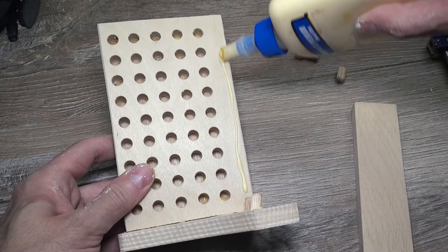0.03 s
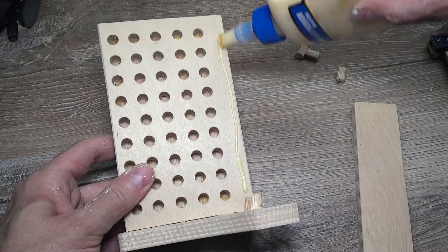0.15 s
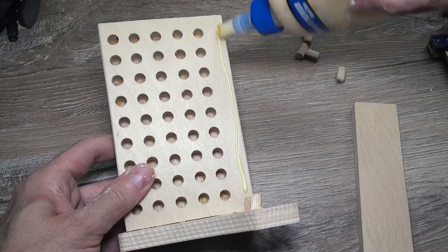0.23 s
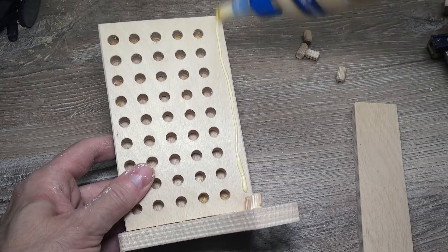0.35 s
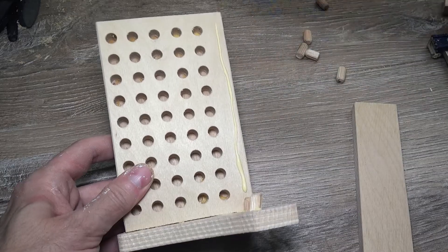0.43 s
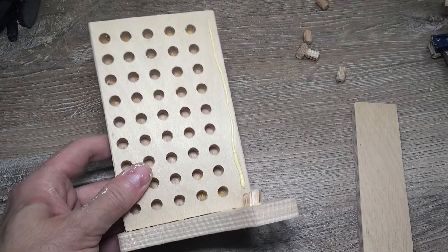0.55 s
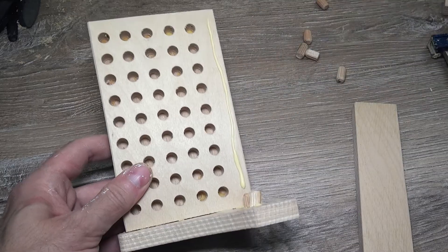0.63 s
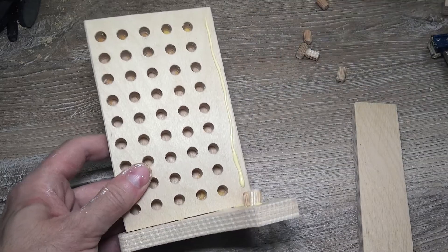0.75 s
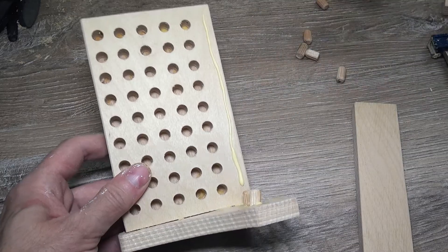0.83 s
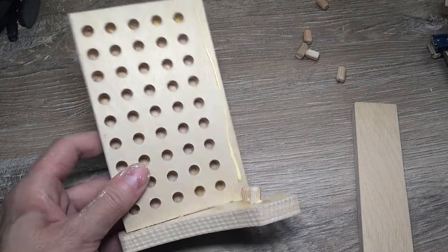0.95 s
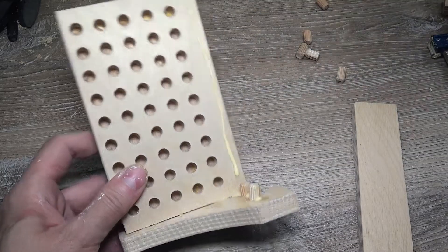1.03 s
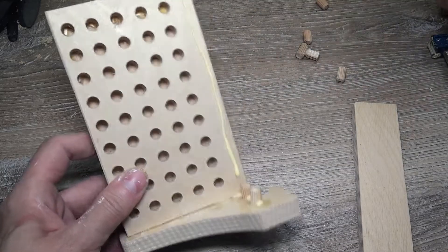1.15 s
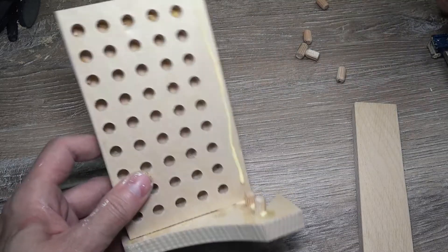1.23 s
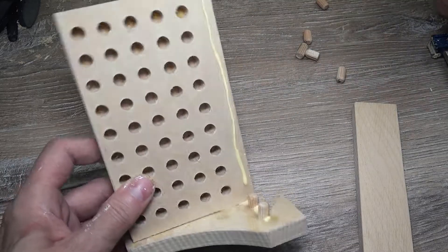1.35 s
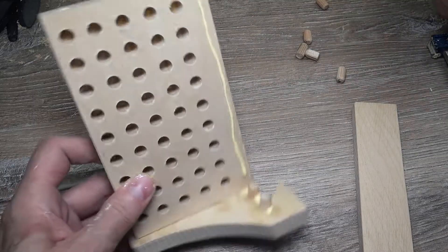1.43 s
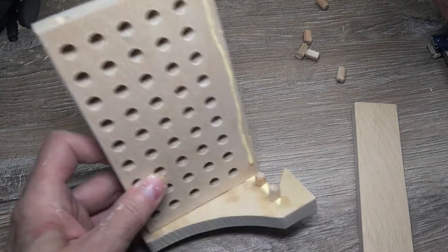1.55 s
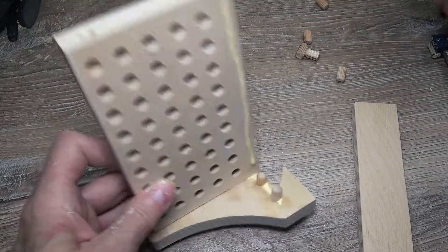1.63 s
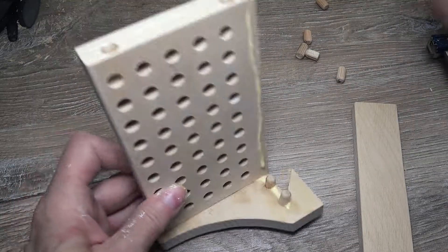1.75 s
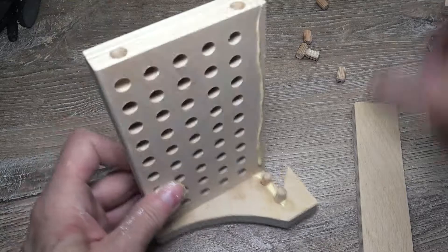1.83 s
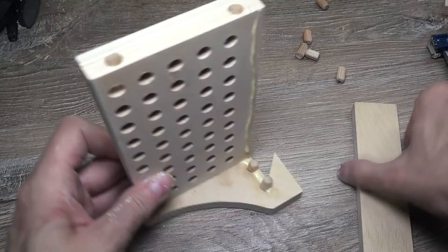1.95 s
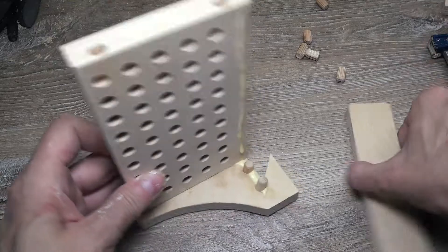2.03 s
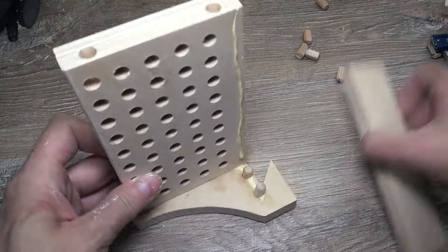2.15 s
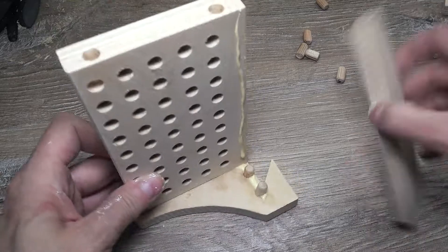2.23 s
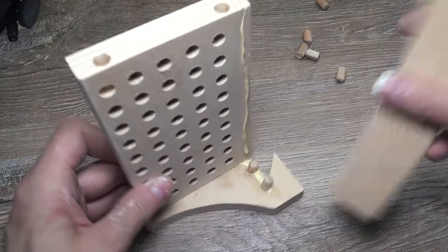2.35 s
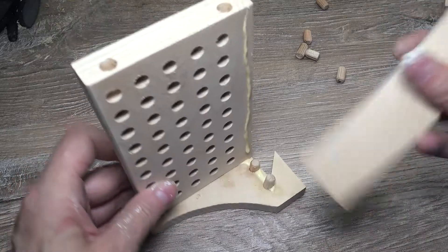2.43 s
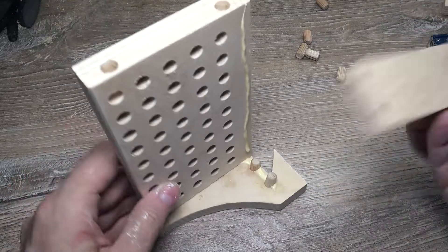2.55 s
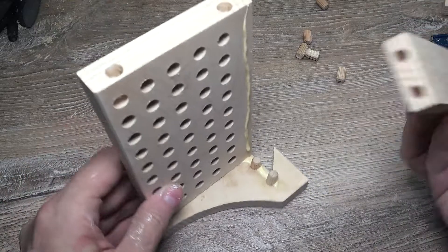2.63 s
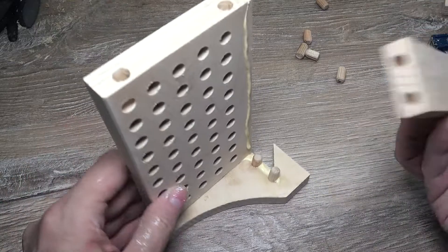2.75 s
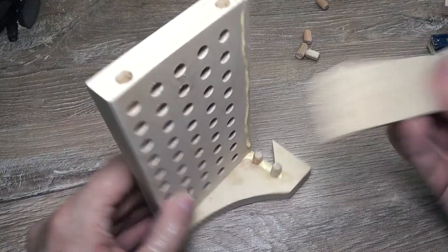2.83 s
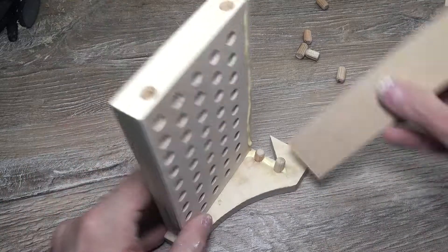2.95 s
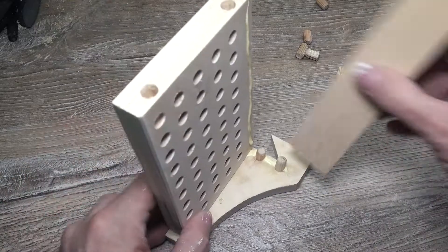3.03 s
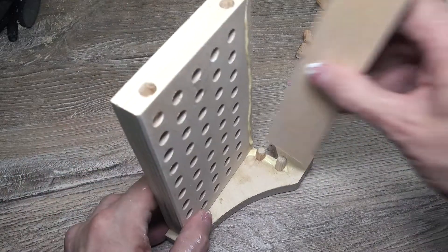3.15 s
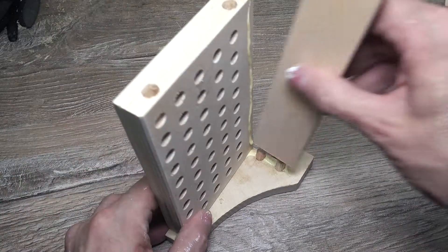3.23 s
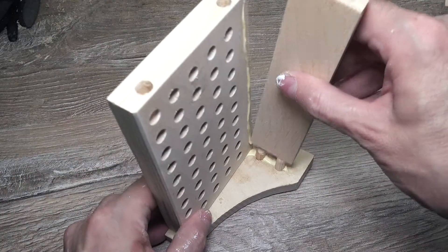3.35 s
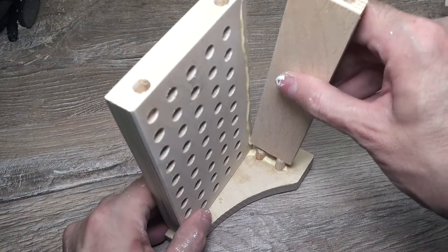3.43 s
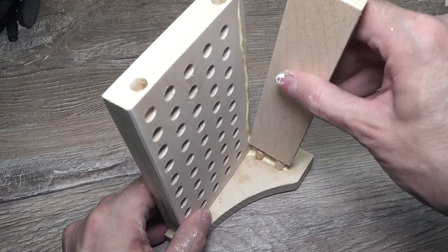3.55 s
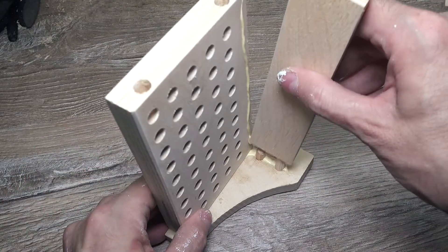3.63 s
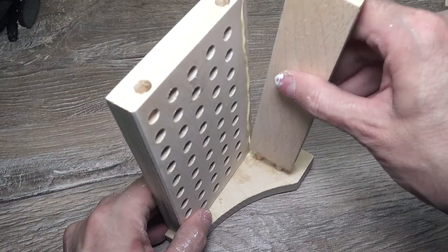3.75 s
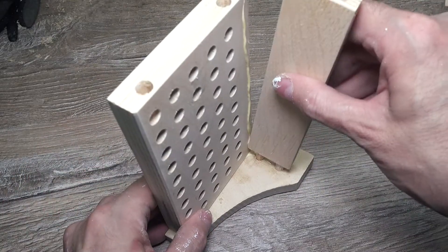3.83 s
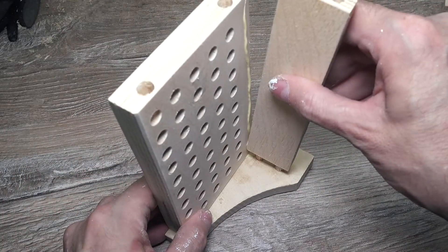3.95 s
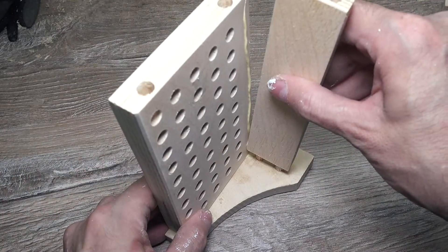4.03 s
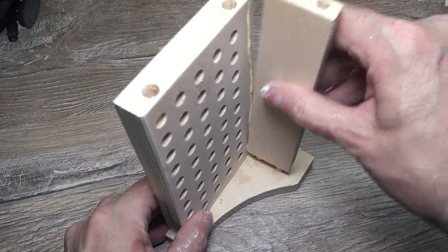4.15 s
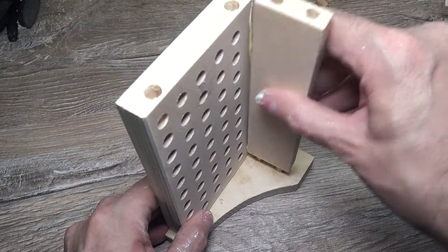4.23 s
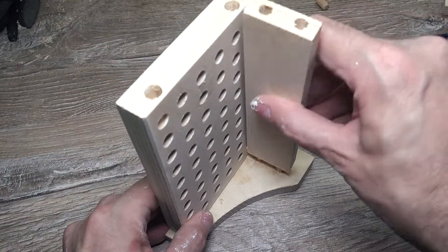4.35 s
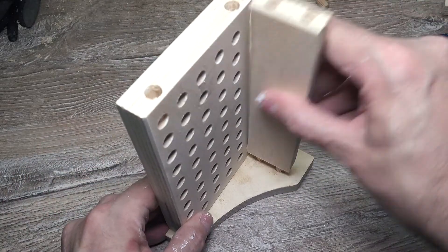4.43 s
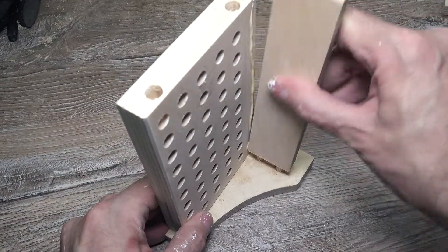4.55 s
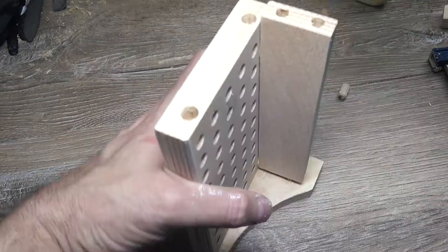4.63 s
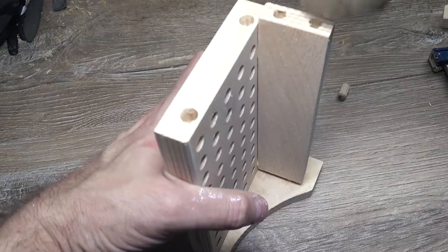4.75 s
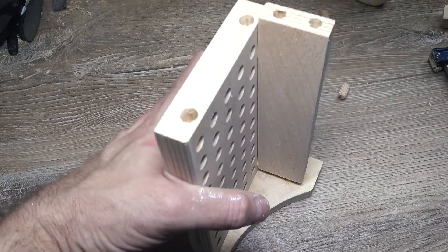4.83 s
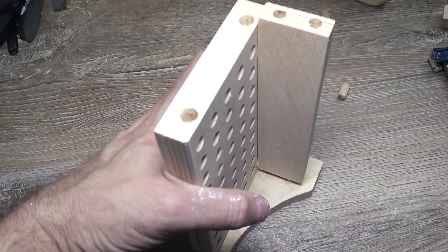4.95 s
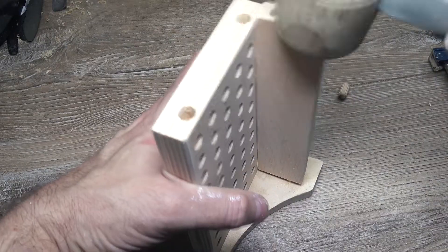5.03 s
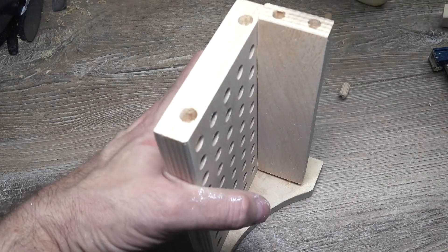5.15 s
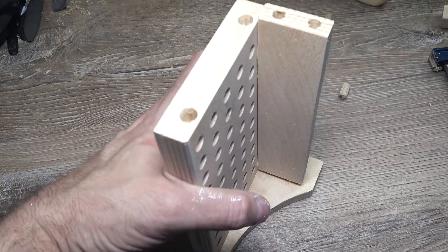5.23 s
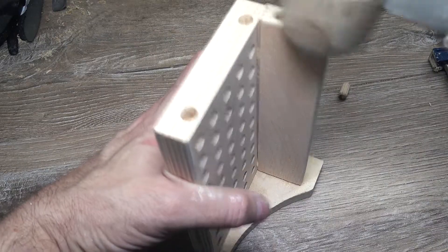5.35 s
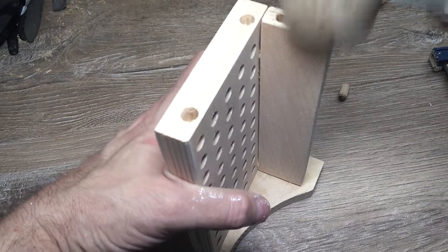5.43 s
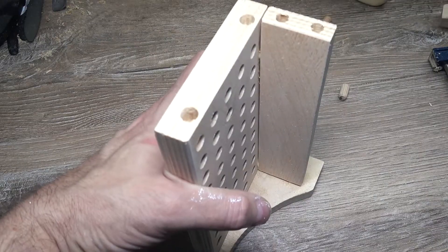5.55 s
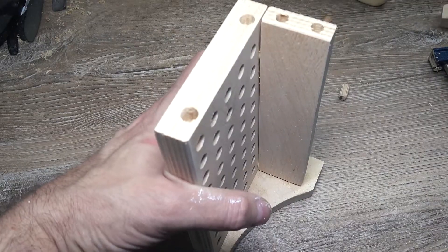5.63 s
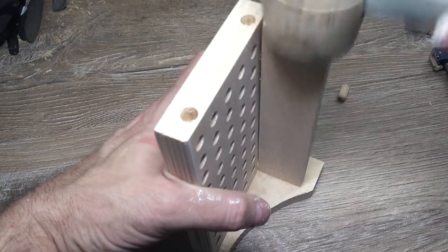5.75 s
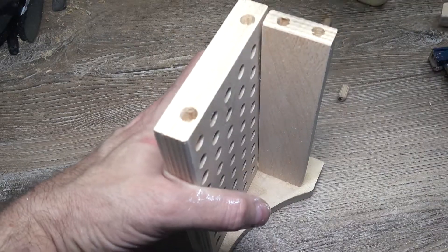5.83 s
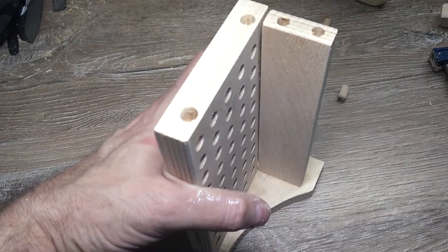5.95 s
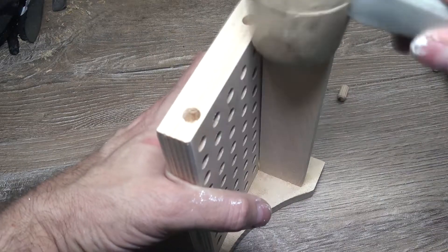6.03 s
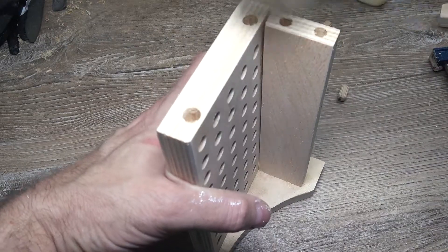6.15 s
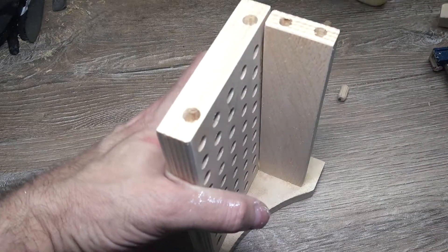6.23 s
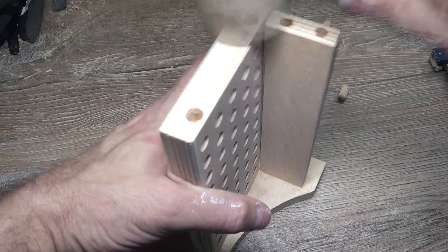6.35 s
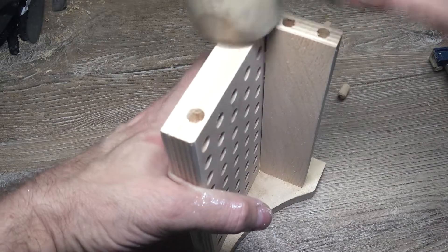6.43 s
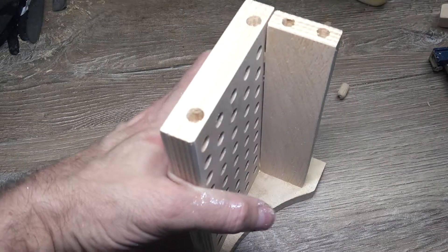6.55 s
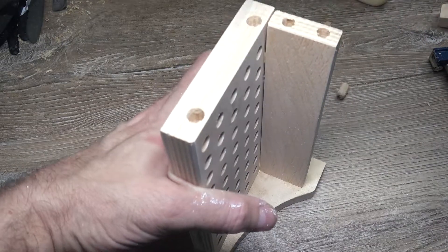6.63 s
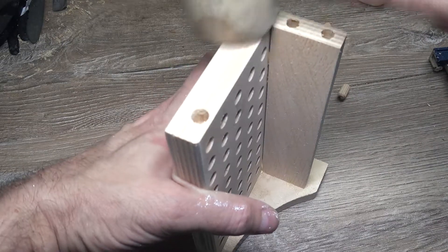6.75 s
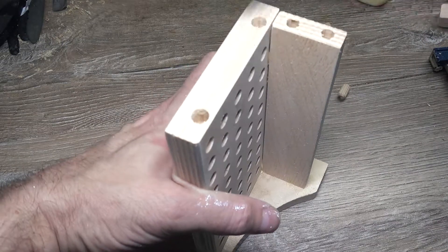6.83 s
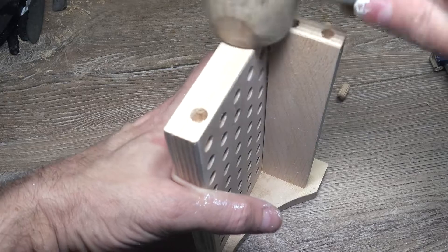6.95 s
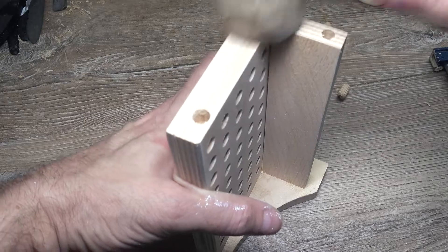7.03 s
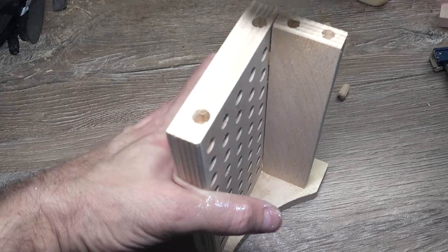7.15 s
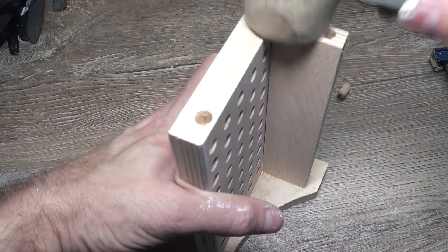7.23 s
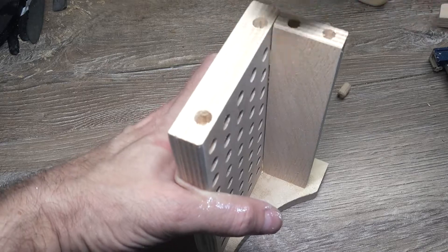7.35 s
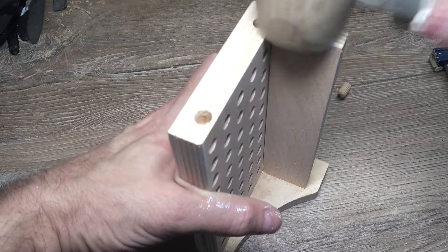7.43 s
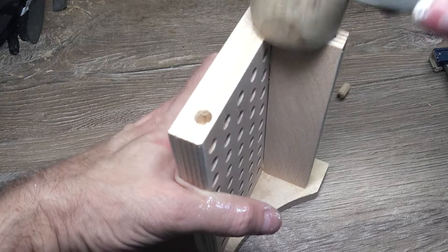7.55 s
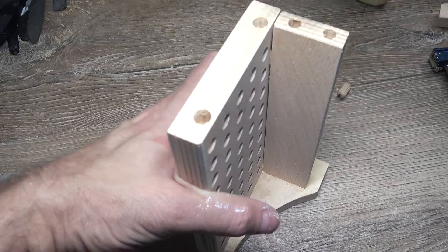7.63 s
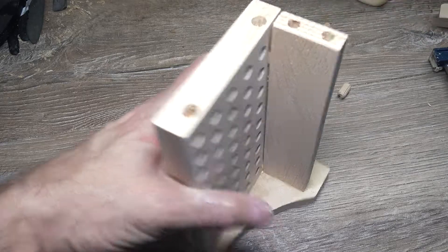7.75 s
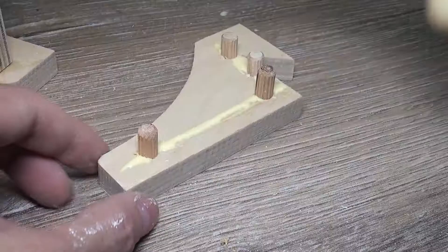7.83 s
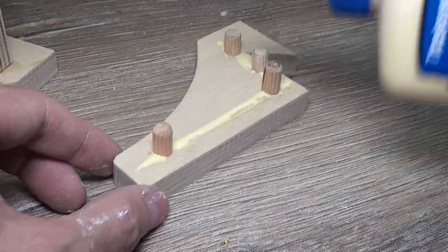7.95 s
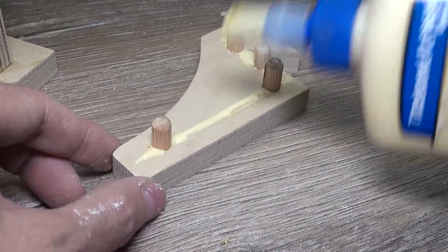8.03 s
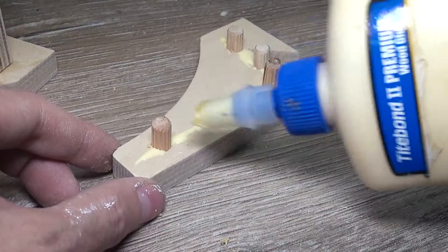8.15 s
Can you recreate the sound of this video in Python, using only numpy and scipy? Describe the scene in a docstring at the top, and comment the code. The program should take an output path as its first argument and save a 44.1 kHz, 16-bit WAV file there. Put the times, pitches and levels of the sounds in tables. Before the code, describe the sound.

Soft rumble and light wooden knocks over low room tone, a short wood rub, then nine loud, boomy mallet hits in a small workshop.

```python
"""A soft rumble over room tone, then light knocks: a drilled plywood block is turned, knocked and dragged on a
hollow bench in a small workshop. A strip is pushed onto dowels; a wooden mallet drives it home in nine quick blows.
Hits and rumbles excite decaying bench and block modes; rubs and ticks add gliding narrow bands and hiss.
Noise in third-octave bands carries the room ring and room tone; a limiter holds the blows down."""
import sys
import numpy as np
from scipy import signal
from scipy.fft import rfft, irfft, next_fast_len
from scipy.io import wavfile

SR = 44100
rng = np.random.default_rng(int(sys.argv[2]) if len(sys.argv) > 2 else 0)


def materialize(psi):
    """Save the field psi as 16-bit PCM at rate SR to the path in sys.argv[1].

    A 1-D psi becomes a single channel; in a 2-D psi each row is a channel.
    """
    bounded = np.clip(np.atleast_2d(psi).T, -1, 1)
    quanta = np.round(bounded * 32767).astype(np.int16)
    wavfile.write(sys.argv[1], SR, quanta)


def ratio_of_db(decibels):
    """Turn decibels (scalar or array-like) into linear amplitude factors; 0 dB maps to 1."""
    return 10 ** (np.asarray(decibels, float) / 20)


N = 361176


def at_hz(points, hz):
    """A spectrum read on a log-frequency axis."""
    table_hz, value = np.array(points).T
    return np.interp(np.log(hz), np.log(np.maximum(table_hz, 1)), value)


def flicker(points_per_s):
    """Random points of spread 1, joined by straight lines."""
    points = rng.standard_normal(int(N / SR * points_per_s) + 2)
    return np.interp(np.arange(N) / SR * points_per_s, np.arange(len(points)), points)


# instants at which all ringing stops: time [s]
STOPS_S = [4.676, 7.832]


def between_stops(b, a, x):
    """A recursive filter that forgets its past at each stop."""
    parts = np.split(x, np.round(np.array(STOPS_S) * SR).astype(int))
    return np.concatenate([signal.lfilter(b, a, part) for part in parts])


def mode(x, hz, t60_s):
    """A damped resonance: a unit click starts a decaying sine of height 1."""
    radius, angle = ratio_of_db(-60 / (t60_s * SR)), 2 * np.pi * hz / SR
    return between_stops([0, np.sin(angle)], [1, -2 * radius * np.cos(angle), radius * radius], x)


def fade(x, time_constant_s):
    """Each impulse dies away exponentially."""
    return between_stops([1], [1, -np.exp(-1 / (time_constant_s * SR))], x)


def swells(rows, column):
    """Each event swells to its peak and dies away, 20 dB in its rise and in its fall time."""
    t, out = np.arange(N) / SR, np.zeros(N)
    for row in rows:
        peak_s, rise_s, fall_s = row[:3]
        near = slice(max(int((peak_s - 3 * rise_s) * SR), 0), int((peak_s + 3 * fall_s) * SR))
        late_s = t[near] - peak_s
        out[near] += ratio_of_db(row[column] - 20 * np.maximum(late_s / fall_s, -late_s / rise_s))
    return out


# mallet blows, relative levels:
# (time [s], crack [dB], room ring [dB], treble ring [dB], deep bench [dB])
BLOWS = [(5.052, 8.5, -3, -9, -9.5), (5.394, 3.5, -5.5, -12.5, -10.5), (5.720, 3.5, -5, -11.5, -11.5),
         (6.032, 0.5, -6.5, -17, -17.5), (6.398, 1.5, -9, -19.5, -18), (6.711, 1, -11.5, -22.5, -16.5),
         (6.976, 0, -14, -27.5, -21.5), (7.227, 2.5, -14.5, -28, -20.5), (7.474, -1.5, -15, -30, -23)]
# wood set down or bumped on the bench; the 7.832 s row is a click at the abrupt stop; relative levels:
# (time [s], crack [dB], room ring [dB], deep bench [dB], upper bench [dB])
KNOCKS = [(0.418, -44, -66, -75, -56.5), (0.761, -48, -76, -73, -78), (1.158, -21, -32, -16, -30),
          (1.34, -40, -36, -28, -39), (1.678, -19.5, -29, -16.5, -21), (1.954, -31.5, -31.5, -32, -38.5),
          (2.102, -32.5, -27.5, -26, -55), (2.225, -21, -29.5, -40, -64), (2.254, -16.5, -33, -48, -69),
          (2.318, -39, -67, -55, -54), (2.362, -34, -55.5, -49, -66), (2.397, -36, -43, -56, -45.5),
          (2.862, -49, -49.5, -63, -44.5), (3.445, -45, -39, -35, -41), (3.848, -50, -46, -35.5, -49),
          (3.921, -46.5, -63, -42, -54), (4.254, -48.5, -68, -58, -71), (4.442, -46, -56.5, -43.5, -60),
          (4.473, -33.5, -37.5, -59, -58), (4.505, -36.5, -50.5, -36.5, -44.5), (4.556, -26, -33, -61, -57),
          (4.666, -48, -43.5, -42.5, -42), (4.757, -56, -56, -41.5, -61.5), (7.01, -21, -25.5, -39, -28.5),
          (7.041, -26.5, -28, -38, -28.5), (7.261, -18, -22.5, -37, -44), (7.69, -32, -37, -54, -47),
          (7.832, -39, -56, -41.5, -56), (7.917, -32, -39.5, -66, -72), (8.093, -39, -43, -69, -78)]


def all_hits():
    """Blows, then knocks: rows of (s, crack, room ring, treble ring, deep bench, upper bench dB)."""
    blows = [(*row, -11 + 0.32 * row[2]) for row in BLOWS]   # upper bench follows room ring
    knocks = []
    for s, crack, ring, deep, upper in KNOCKS:
        treble = ring - 17 + 0.72 * (crack - ring)   # a sharper crack brightens the ring
        knocks.append((s, crack, ring, treble, deep, upper))
    return np.array(blows + knocks)


def clicks(level_db):
    """One impulse at each row of all_hits(), over a negligible floor."""
    out = np.full(N, 1e-18)
    out[np.round(all_hits()[:, 0] * SR).astype(int)] = ratio_of_db(level_db)
    return out


def hardness(hits, usual_db=-13):
    """dB per octave by which a hit is brighter than usual, from its treble over room ring."""
    return (hits[:, 3] - hits[:, 2] - usual_db) / 2


def since_blow():
    """Seconds since the latest mallet blow, zero before the first and after the last stop."""
    t, at = np.arange(N) / SR, np.array(BLOWS)[:, 0]
    latest = at[np.maximum(np.searchsorted(at, t) - 1, 0)]
    return (t - latest) * (t > at[0]) * (t < STOPS_S[1])


# bench modes ringing freely, close pairs beat: (frequency [Hz], relative level [dB], t60 [s])
BENCH_MODES = [(77.7, -8.5, 1), (108.96, 2, 0.89), (118.4, -4, 0.26), (152.9, -7, 0.81),
               (172.4, -7.5, 0.59), (224, -13, 0.81), (240.8, -14.5, 0.37), (257, -6.5, 0.8),
               (268.5, -5, 0.49), (329, -15, 0.4), (364, -14.5, 0.54), (426.4, -10.5, 0.37),
               (478, -17, 0.62), (536, -18.5, 0.3), (708.6, -15.5, 0.36)]
# dragging weight shakes the bench; near 4.7 s a low rumble dies away; relative levels:
# (peak time [s], 20 dB rise [s], 20 dB fall [s], deep [dB], upper [dB])
RUMBLES = [(0.0, 0.011, 0.029, -55, -34), (0.146, 0.037, 0.34, -74, -56.5), (0.424, .02, 0.039, -73, -47),
           (0.528, 0.07, .1, -73, -56), (1.85, 0.013, .4, -33.5, -41.5), (1.955, 0.08, 0.13, -31.5, -41.5),
           (2.04, 0.1, 0.16, -32, -52), (2.126, 0.05, 0.031, -48, -25), (2.188, 0.12, 0.035, -36, -55),
           (2.264, 0.024, 0.013, -45, -25), (2.466, .12, 0.032, -49, -42.5), (2.5, .1, 0.49, -61, -51.5),
           (2.934, 0.11, .07, -68, -35.5), (3.038, 0.12, 0.14, -44.5, -67), (3.18, 0.024, 0.02, -59, -64),
           (4.42, 0.0093, .03, -55, -70), (4.56, 0.021, 0.058, -39, -43.5),
           (4.668, 0.039, 0.15, -40, -52.5), (4.78, .3, .2, -50, -56), (7.84, .005, 0.031, -43, -57),
           (7.922, 0.22, 0.18, -64, -63), (8.1, .1, .13, -62, -68)]


def bench(shake_db=-34, hand_damping=0.73, edge_deep_db=-7, edge_high_db=3.0, low_cut_hz=80,
          sag_after_s=0.115, sag_deep_db=-6.5, sag_upper_db=2.5):
    """Hits, each with its own strengths, and rumbles push hollow-top modes; all but blows are damped more."""
    hits, out = all_hits(), np.zeros(N)
    luck_db = rng.normal(0, 2.5, (len(hits), len(BENCH_MODES)))
    rough = rng.standard_normal(N) * ratio_of_db(shake_db)
    shakes = [swells(RUMBLES, column=3) * rough, swells(RUMBLES, column=4) * rough]
    is_blow = clicks(np.where(np.arange(len(hits)) < len(BLOWS), 0, -200)) > .5
    # after each blow the deep boom steps down and the upper boom up, over 10 ms
    step = np.clip((since_blow() - sag_after_s) / 0.01, 0, 1)
    sags = [ratio_of_db(sag_deep_db * step), ratio_of_db(sag_upper_db * step)]
    for k, (hz, level_db, t60_s) in enumerate(BENCH_MODES):
        upper = int(hz > 200)
        push = clicks(hits[:, 4 + upper] + luck_db[:, k])
        # knocks land off-centre: the deepest modes move less, the high ones more
        edge = ratio_of_db(edge_deep_db * (hz < 130) + edge_high_db * (hz > 300))
        free = sags[upper] * mode(push * is_blow, hz, t60_s)
        # the hand damps knocks and dragging
        held = mode(push * ~is_blow * edge + shakes[upper], hz, hand_damping * t60_s)
        out += ratio_of_db(level_db) * (free + held)
    # a board radiates little deep bass
    return signal.sosfilt(signal.butter(3, low_cut_hz, "high", fs=SR, output="sos"), out)


# short plywood modes: (frequency [Hz], relative level [dB], t60 [s])
BLOCK_MODES = [(702, -5.5, 0.073), (899, -2.5, 0.061), (1108, -6.5, 0.041), (1370, -7.5, 0.0056),
               (1323, 1.5, 0.017), (1920, -6, 0.015), (2086, -18, 0.03), (2800, -9.5, 0.0042),
               (4500, -15.5, 0.0067), (7030, -27.5, 0.012), (11600, -19.5, 0.001)]
# skin and wood slip on wood; from 5.4 to 6.5 s loose pieces tick after blows; relative levels,
# also played by friction_power(): (peak time [s], 20 dB rise [s], 20 dB fall [s], hiss [dB], sibilant top [dB])
RUBS_AND_TICKS = [(0.705, .006, 0.025, -65, -68), (0.774, 0.013, 0.24, -63.5, -59.5),
                  (0.96, .3, 0.067, -62.5, -61.5), (1.332, 0.0066, 0.014, -52, -62),
                  (1.398, 0.025, 0.048, -58, -86), (1.48, 0.031, 0.15, -64, -58.5),
                  (1.55, 0.36, 0.051, -56, -61.5), (1.66, 0.068, .02, -56, -63),
                  (1.956, .1, 0.11, -44.5, -57), (2.08, 0.076, 0.049, -44.5, -55.5),
                  (2.104, 0.0079, .09, -35.5, -48.5), (2.25, 0.042, 0.028, -54, -56),
                  (2.264, 0.026, 0.011, -31, -60), (2.408, 0.087, 0.045, -45, -65),
                  (2.498, .2, 0.39, -51.5, -65.5), (2.866, 0.0071, .1, -43.5, -49),
                  (2.904, 0.06, 0.15, -43, -58), (3.0, 0.16, 0.015, -50.5, -74),
                  (3.09, 0.049, 0.083, -61, -66), (3.15, 0.11, 0.016, -61, -58.5),
                  (3.446, .004, 0.014, -56.5, -65), (3.848, 0.0042, 0.0081, -64, -66),
                  (3.872, 0.018, .06, -65.5, -64), (3.92, 0.0057, 0.013, -53, -51.5),
                  (4.447, 0.0067, 0.012, -53.5, -53.5), (4.479, .006, 0.012, -53, -50),
                  (4.508, .006, 0.011, -47, -47), (4.56, 0.0068, 0.033, -50, -46.5),
                  (4.59, 0.057, 0.031, -58, -61.5), (4.674, 0.017, .004, -54, -56),
                  (5.447, .01, .02, -40, -46), (5.52, .005, .015, -45, -49.5), (5.79, .01, .02, -42, -46),
                  (6.445, .006, 0.033, -42, -48.5), (7.84, 0.007, 0.25, -60, -65.5),
                  (7.924, 0.04, 0.022, -53, -66), (8.044, 0.19, 0.1, -54.5, -65.5)]


def block(catches_per_s=900, scratch_db=-4, crack_top_hz=12000):
    """Short plywood modes, cracked by hits (brighter when hard) and scratched by random catches in rubs and ticks."""
    hits, out = all_hits(), np.zeros(N)
    luck_db = rng.normal(0, 2.5, (len(hits), len(BLOCK_MODES)))
    caught = rng.random(N) < catches_per_s / SR
    catches = caught * rng.standard_normal(N) * swells(RUBS_AND_TICKS, column=3)
    for k, (hz, level_db, t60_s) in enumerate(BLOCK_MODES):
        tilt_db = hardness(hits) * np.log2(min(hz, crack_top_hz) / 1000)
        crack = clicks(hits[:, 1] - 9 + tilt_db + luck_db[:, k])
        scratch = catches * ratio_of_db(scratch_db + 11.7 * np.log2(min(hz, 4500) / 2000))
        out -= (-1) ** k * ratio_of_db(level_db) * mode(crack + scratch, hz, t60_s)   # signs alternate
    return out


def squeak(rows, points_per_s):
    """A wavering narrow band of noise whose centre glides from slip to slip."""
    hz = np.interp(np.arange(N) / SR, *np.transpose(rows)[[0, 4]])
    phase = np.cumsum(2 * np.pi * hz / SR)
    broken = ratio_of_db(3.5 * flicker(40))   # the slip comes and goes
    band = flicker(points_per_s) * np.cos(phase) + flicker(points_per_s) * np.sin(phase)
    return broken * swells(rows, column=3) * band


# rubbed wood sings in one gliding band:
# (peak time [s], 20 dB rise [s], 20 dB fall [s], relative level [dB], centre [Hz])
SQUEAKS = [(2.1, 0.22, 0.12, -51.5, 2094), (2.262, .03, 0.021, -27, 2108),
           (2.368, 0.05, 0.021, -44.5, 2090), (2.404, .04, 0.072, -45.5, 2110), (2.5, .2, .4, -59, 2224),
           (2.71, 0.083, .3, -63, 2274), (2.8, 0.13, 0.18, -58, 2240), (2.86, .1, .05, -65, 2180)]
# slips that sing in a band of their own, without a glide:
# (peak time [s], 20 dB rise [s], 20 dB fall [s], relative level [dB], centre [Hz])
CHIRPS = [(1.546, 0.081, .03, -49, 4770), (1.568, .03, 0.024, -53, 3500), (1.65, .04, .03, -58, 2800),
          (1.955, 0.069, 0.11, -45.5, 1800), (1.96, 0.12, 0.079, -54.5, 3980),
          (1.985, 0.018, .03, -39, 930), (2.1, 0.043, .04, -45.5, 5100), (2.125, .02, 0.025, -49, 3800),
          (2.265, 0.029, 0.012, -39, 4420), (2.93, 0.073, 0.085, -37, 262), (3.1, .1, 0.056, -56, 4500),
          (3.925, 0.12, .02, -58.5, 1885), (6.46, .01, 0.048, -37, 4510)]


def squeaks():
    """Rubbed wood sings: one gliding band plus fixed bands that waver in proportion to their centre."""
    return squeak(SQUEAKS, 200) + sum(squeak([row], .16 * row[4]) for row in CHIRPS)


def hard_tilt_db(hits, hz, low_hz=0):
    """Brightness of hard hits in a noise band, with no further tilt above 5140 Hz."""
    return hardness(hits) * np.log2(np.clip(hz, low_hz, 5140) / 1000)


def splinter_power(hz, puff_db=-26, puff_s=0.003):
    """Dry splinter of noise at contact, above 400 Hz."""
    hits = all_hits()
    puff = clicks(hits[:, 1] + hard_tilt_db(hits, hz) - 8.0 * np.log2(max(hz, 900) / 1000)) ** 2
    return fade(puff, puff_s) * ratio_of_db(puff_db) ** 2 * (hz > 400) / 1000


# hiss of rubs and ticks: (frequency [Hz], relative density [dB per Hz])
HISS = [(150, -24), (600, -9.5), (1500, -11.5), (2100, -6.5), (3000, -12.5), (4500, -5.5), (5600, -18.5),
        (6300, -4)]
# sibilance above the hiss: (frequency [Hz], relative density [dB per Hz])
SIBILANCE = [(6300, -14), (6900, -3.5), (7500, -6), (9000, -1), (12000, -1), (15000, -5), (16000, -15)]


def friction_power(hz, grit, hiss_db=-35, top_db=-38):
    """Noise of rubs and ticks: hiss below, sibilance above, both grainy."""
    if hz < HISS[-1][0]:
        return (grit * swells(RUBS_AND_TICKS, column=3) * ratio_of_db(at_hz(HISS, hz) + hiss_db)) ** 2
    return (grit * swells(RUBS_AND_TICKS, column=4) * ratio_of_db(at_hz(SIBILANCE, hz) + top_db)) ** 2


# room ring after hits: (frequency [Hz], relative density [dB per Hz])
RING = [(24, -55.5), (40, -41), (101, -9.5), (185, -17), (269, -6.5), (402, -16), (467, -17), (1300, -22),
        (3560, -42), (4460, -39), (5440, -53.5), (11300, -55.5), (16000, -58.5)]
# its decay after heavy hits: (frequency [Hz], t60 [s])
RING_T60 = [(60, 0.91), (300, 0.69), (1000, 0.51), (3000, 0.37), (8000, 0.33), (15000, 0.21)]


def ring_power(hz, rattle, build_up_s=0.0042, ring_db=-20, light_share=0.21):
    """Echoes gather, then decay exponentially, sooner after light knocks."""
    hits = all_hits()
    heavy = clicks(hits[:, 1]) > ratio_of_db(-30)   # light knocks hardly reach the walls
    struck = clicks(hits[:, 2] + hard_tilt_db(hits, hz, low_hz=400)) ** 2
    decay_s = at_hz(RING_T60, hz) / np.log(1e6)
    late = fade(struck * heavy, decay_s) + fade(struck * ~heavy, light_share * decay_s)
    late = np.maximum(late - fade(struck, build_up_s), 0)   # echoes take a moment to gather
    return late * rattle * ratio_of_db(at_hz(RING, hz) + ring_db) ** 2


# room tone spectrum: (frequency [Hz], relative density [dB per Hz])
AIR = [(15, -29), (25, 5), (97, -8.5), (130, 5), (170, -15), (263, -6.5), (476, -13.5), (575, -12),
       (624, -14), (1840, -24.5), (2050, -27.5), (4740, -47.5), (6380, -46.5), (8830, -39), (16000, -34.5)]
# room tone, abruptly low from 4.68 to 7.82 s: (time [s], relative level [dB])
AIR_LEVEL = [(0, -54.5), (.7, -55.5), (4.67, -56), (4.68, -74), (7.82, -71), (7.84, -47), (8.19, -52.5)]


def air_power(hz, air_db=-24):
    """Steady-spectrum room tone that follows its level in time."""
    level = ratio_of_db(np.interp(np.arange(N) / SR, *np.transpose(AIR_LEVEL)))
    return (level * ratio_of_db(at_hz(AIR, hz) + air_db)) ** 2


# (frequency [Hz], left-right likeness [0..1])
LIKENESS = [(60, 1), (180, 0.95), (550, 0.82), (1650, 0.93), (5000, 0.41), (15000, .3)]


def diffuse(rattle_db=2.0, grain_db=4.0):
    """Third-octave stereo noise carries splinters, rubs and ticks, room ring and room tone, summed as power."""
    out, edges_hz = np.zeros((2, N)), 25 * 2 ** np.arange(0, 9.4, 1 / 3)
    white = rng.standard_normal((2, 2, N))
    grit = ratio_of_db(grain_db * flicker(150))   # sliding catches and slips
    rattle = ratio_of_db(rattle_db * flicker(90)) ** 2   # loose pieces chatter on the shaking bench
    for k, (low_hz, high_hz) in enumerate(zip(edges_hz, edges_hz[1:])):
        hz = np.sqrt(low_hz * high_hz)
        power = splinter_power(hz) + friction_power(hz, grit) + ring_power(hz, rattle) + air_power(hz)
        band = signal.butter(2, [low_hz, high_hz], "band", fs=SR, output="sos")
        mid, side = signal.sosfilt(band, white[k % 2])   # neighbour bands use different noise
        alike = np.clip(at_hz(LIKENESS, hz), 0, 1)
        stereo = np.sqrt(1 + alike) * mid + np.sqrt(1 - alike) * side * [[1], [-1]]
        out += np.sqrt(power * SR / 4) * stereo
    return out


# level between the ports: (frequency [Hz], left minus right [dB])
LEAN = [(60, 0), (180, 0.5), (550, 0), (1650, -3), (4970, -5), (15000, 1.5)]
# phase between the ports: (frequency [Hz], left lead [rad])
LEAD = [(80, 0.29), (300, 0.43), (600, 1), (1200, 1.26), (3800, .9), (5700, 1.3), (8000, 1.6), (14000, 1.8)]


def scene():
    """All sources reach two close microphone ports that differ in level and phase."""
    size = next_fast_len(N + 64)
    hz = np.arange(size // 2 + 1) * SR / size + 1e-3
    lean = ratio_of_db(at_hz(LEAN, hz) / 2) * np.exp(.5j * at_hz(LEAD, hz))   # half to each side
    wood = bench() + block() + squeaks()
    return irfft(rfft(wood + diffuse(), size) * np.array([lean, 1 / lean]), size)[:, :N]


def roll_off(x):
    """The treble ends steeply here."""
    return signal.sosfilt(signal.butter(12, 16790, fs=SR, output="sos"), x)


def record(dry):
    """Top cut, then an over-reacting limiter: harder blows duck deeper, the ring swells as it lets go."""
    top_cut_hz, hold_db, duck_db_per_db = 16350, -5.5, 1.603
    attack_s, release_db_per_s, ahead_s = 0.00031, 173, 0.00069
    dry = signal.sosfilt(signal.cheby2(10, 50, top_cut_hz, fs=SR, output="sos"), dry)
    level_db = 20 * np.log10(np.abs(dry).max(axis=0) + 1e-9)
    cut_db = duck_db_per_db * np.maximum(level_db - hold_db, 0)
    ramp_db = release_db_per_s * np.arange(N) / SR
    cut_db = np.maximum.accumulate(cut_db + ramp_db) - ramp_db   # linear release in dB
    cut_db = fade(cut_db, attack_s) * (1 - np.exp(-1 / (attack_s * SR)))
    cut_db = np.interp(np.arange(N) + ahead_s * SR, np.arange(N), cut_db)   # look ahead
    return roll_off(dry * ratio_of_db(-cut_db))


dry = scene()
out = record(dry)
materialize(out)
```